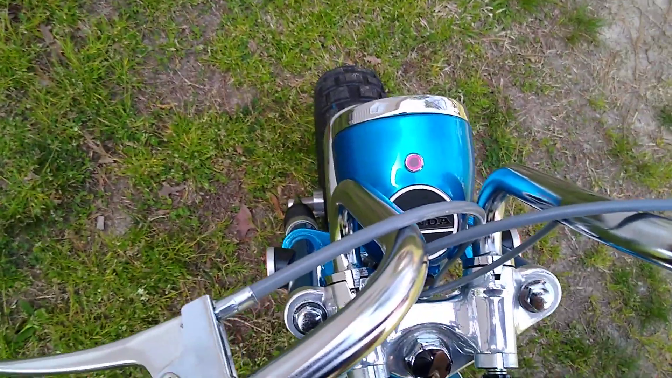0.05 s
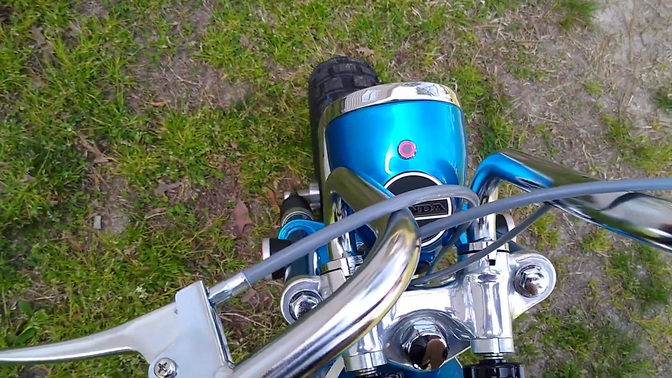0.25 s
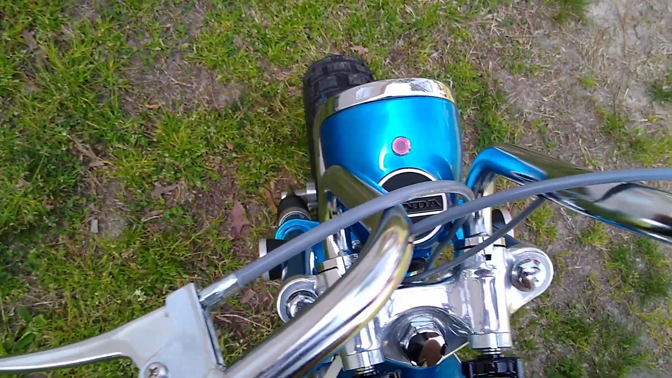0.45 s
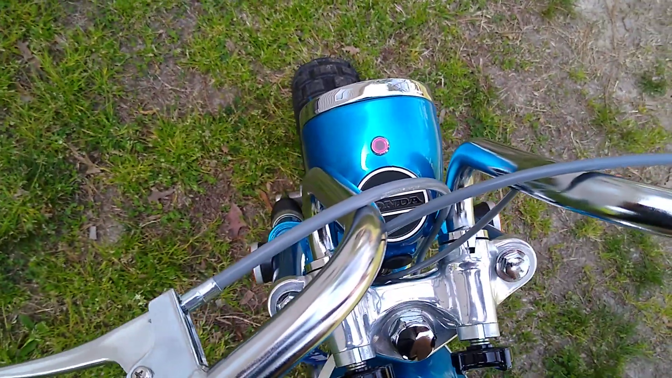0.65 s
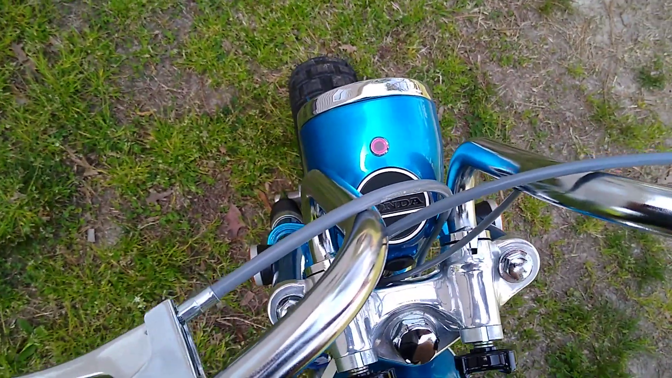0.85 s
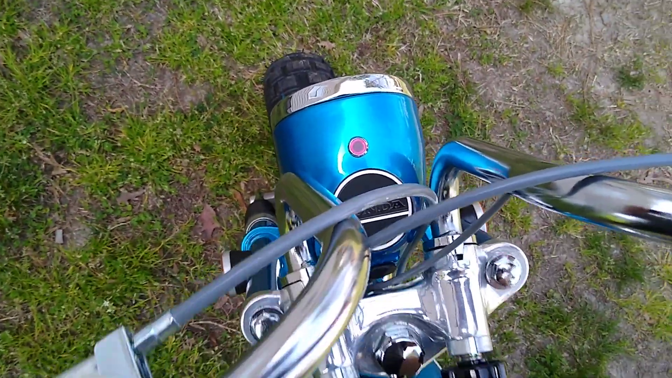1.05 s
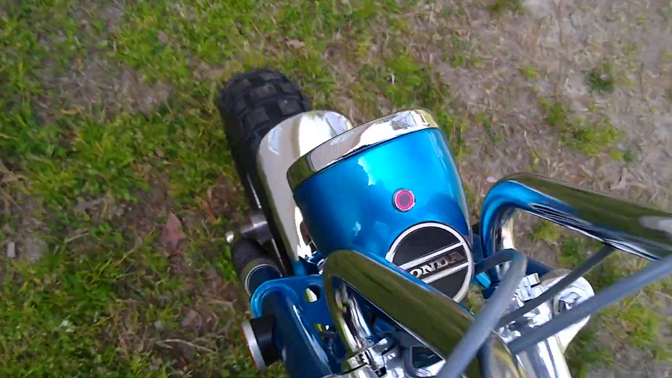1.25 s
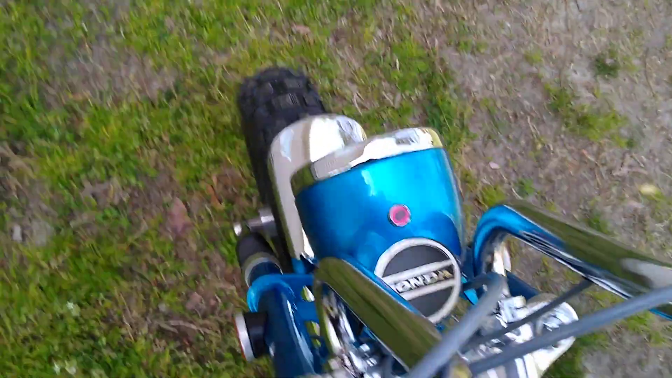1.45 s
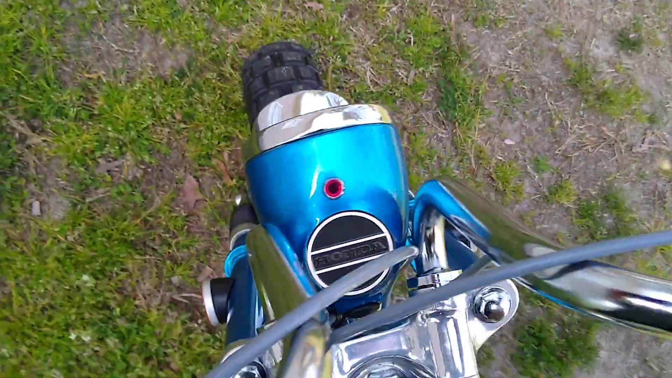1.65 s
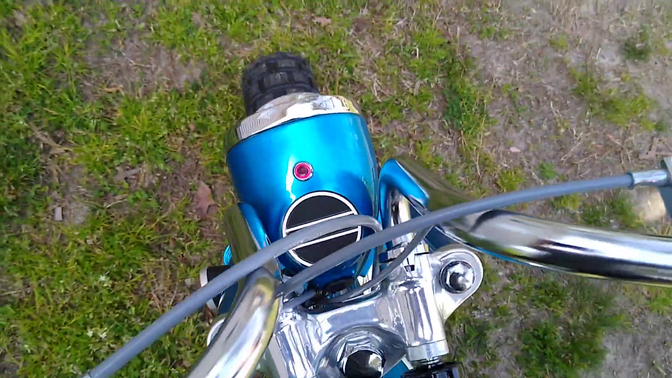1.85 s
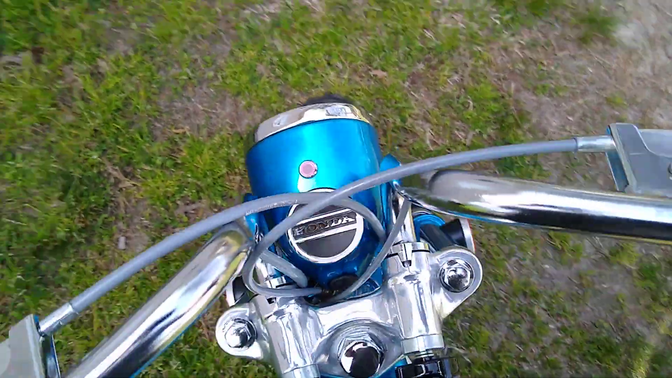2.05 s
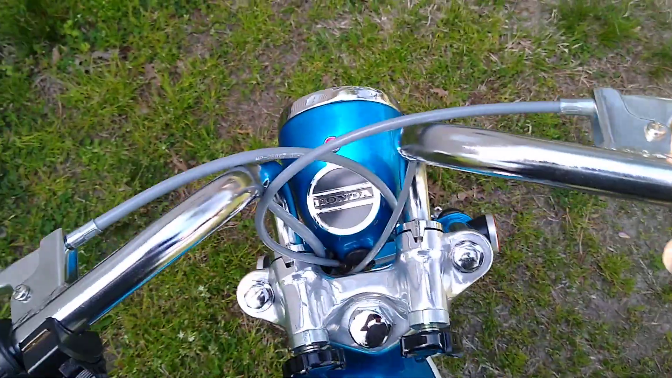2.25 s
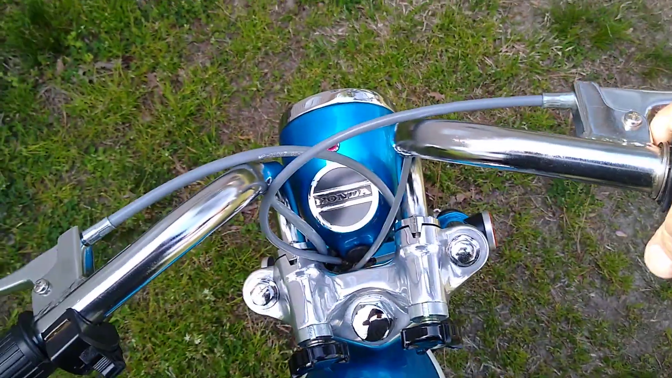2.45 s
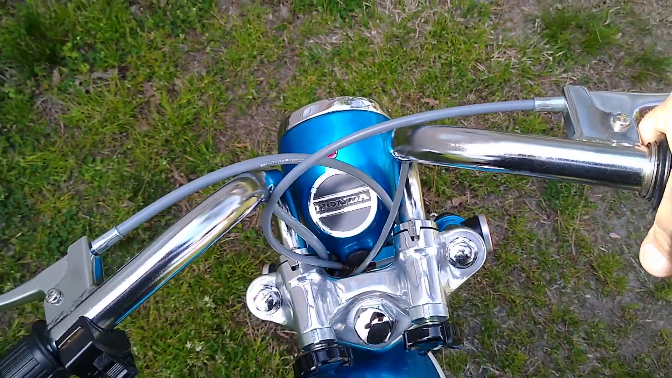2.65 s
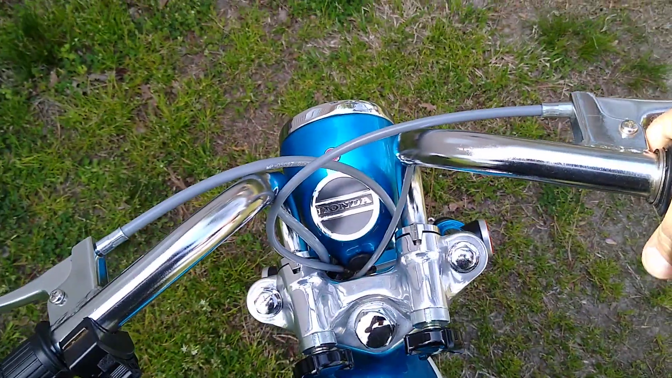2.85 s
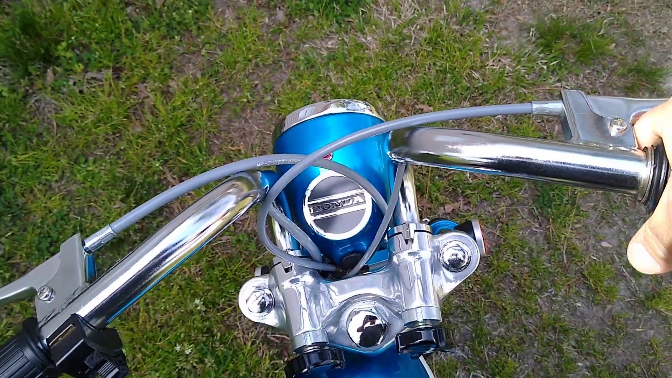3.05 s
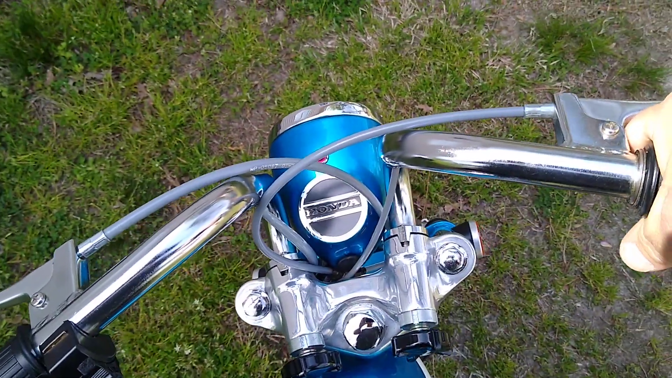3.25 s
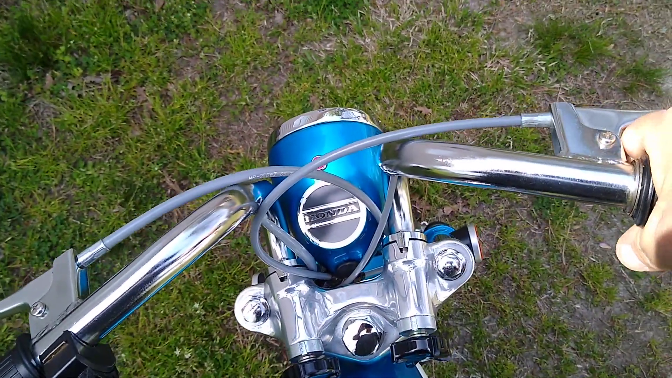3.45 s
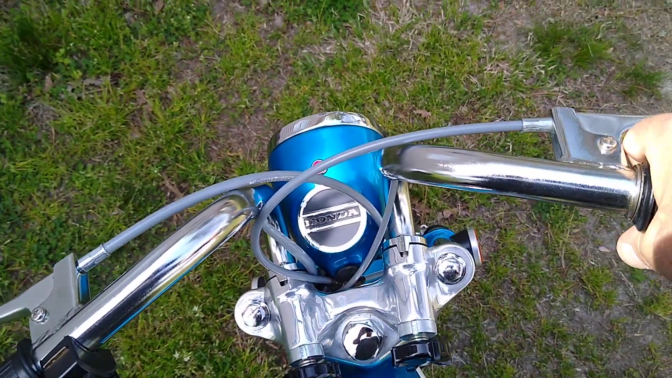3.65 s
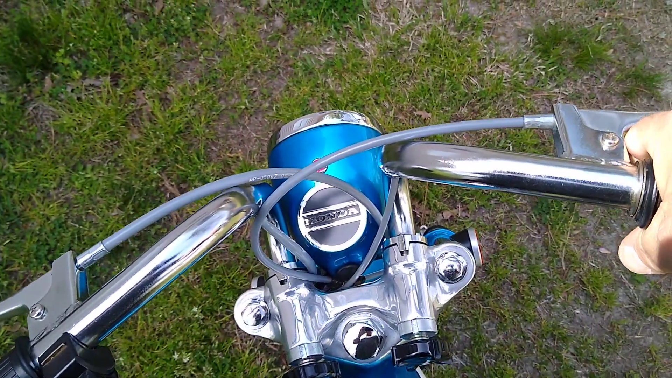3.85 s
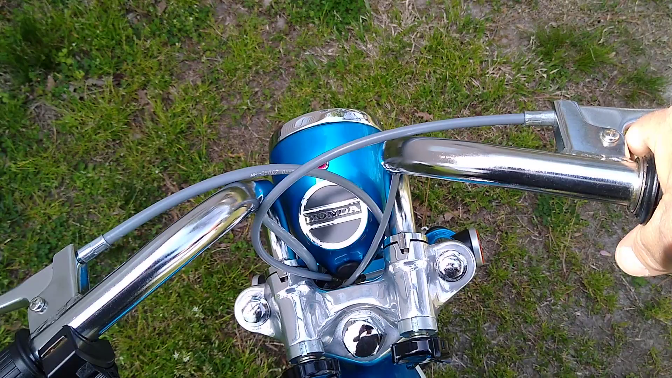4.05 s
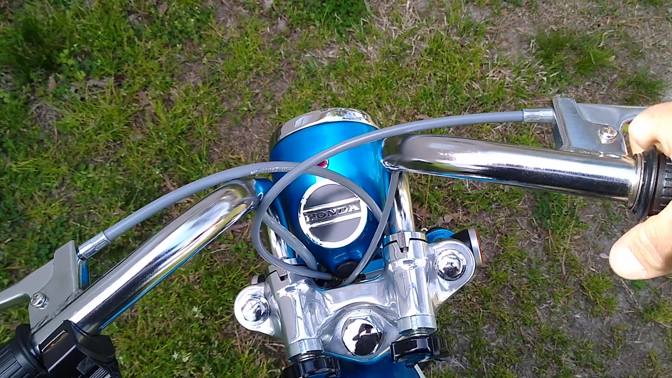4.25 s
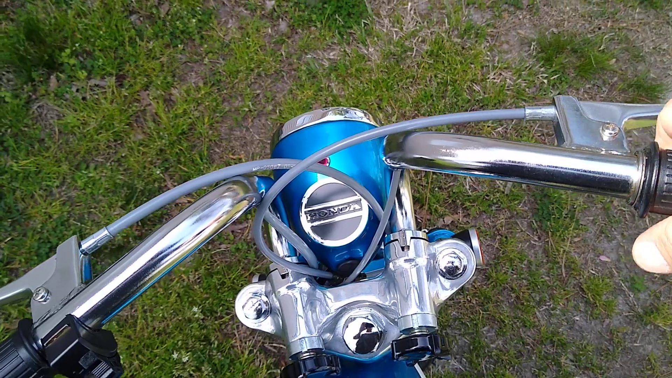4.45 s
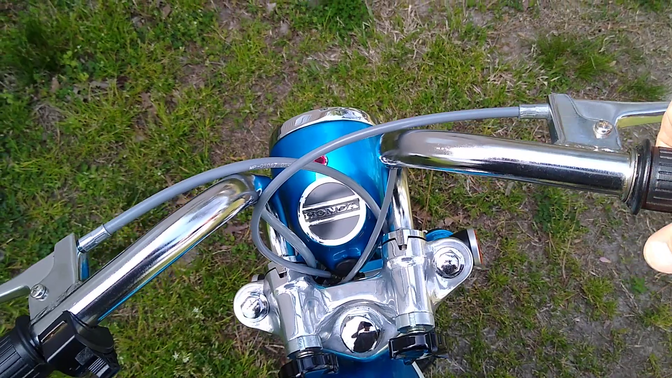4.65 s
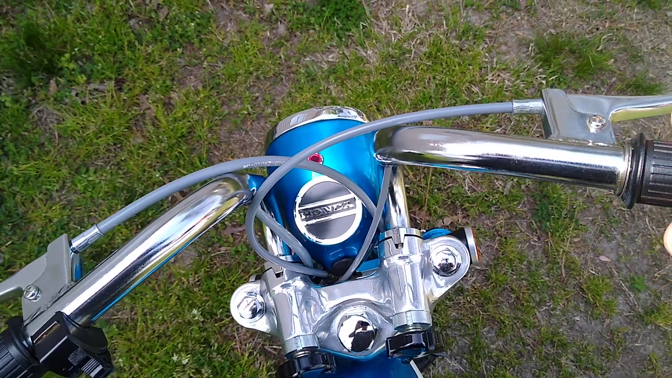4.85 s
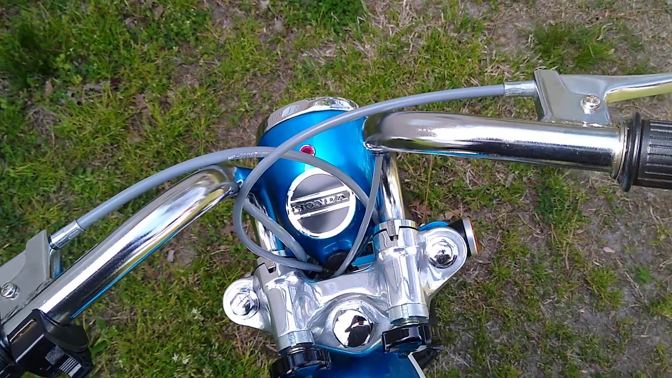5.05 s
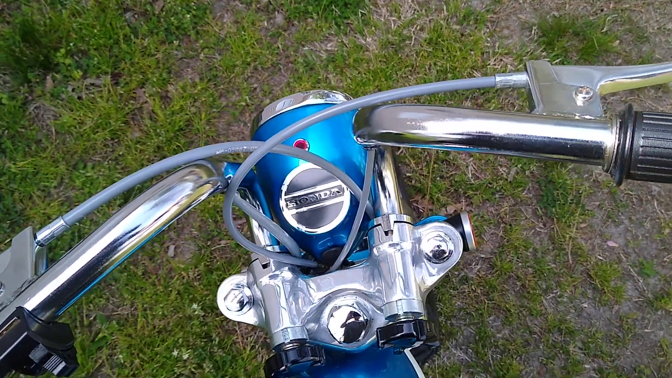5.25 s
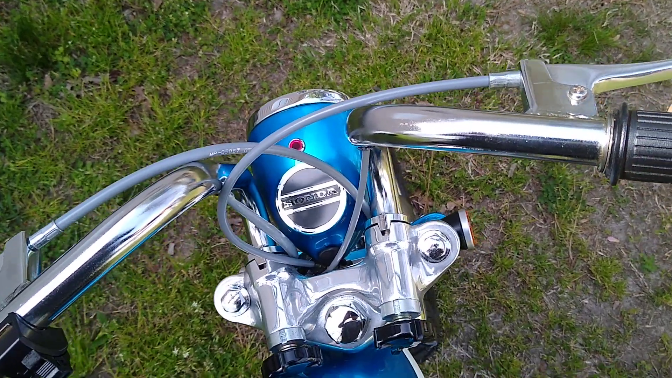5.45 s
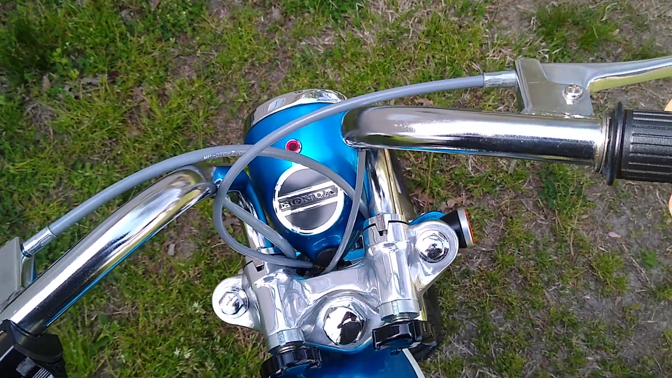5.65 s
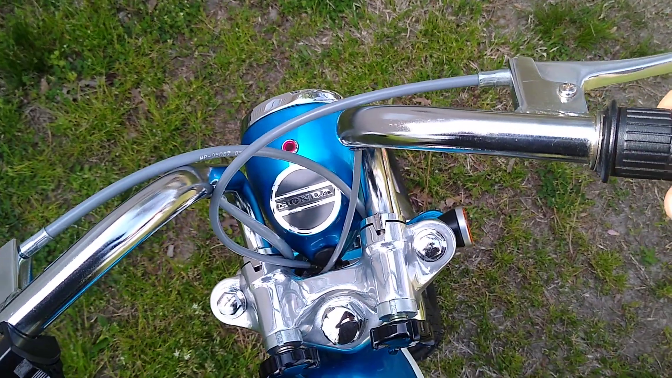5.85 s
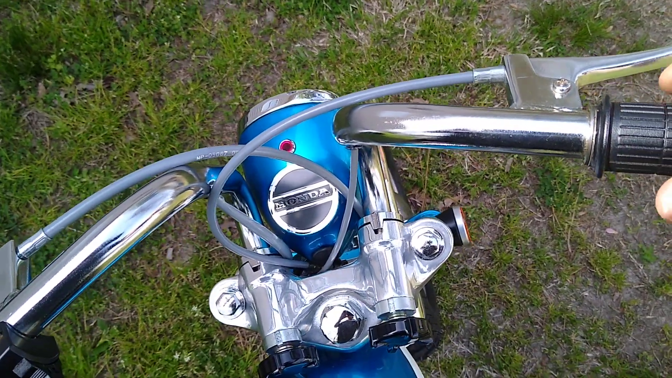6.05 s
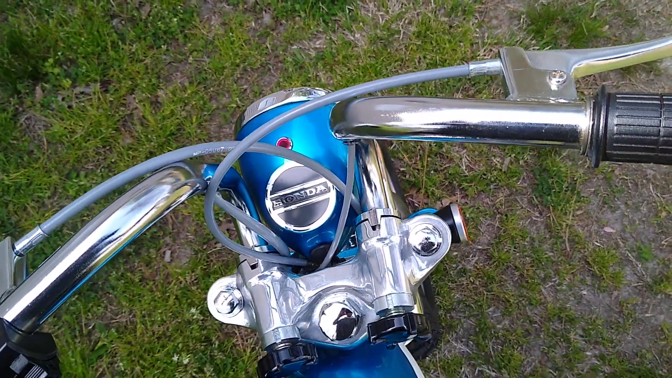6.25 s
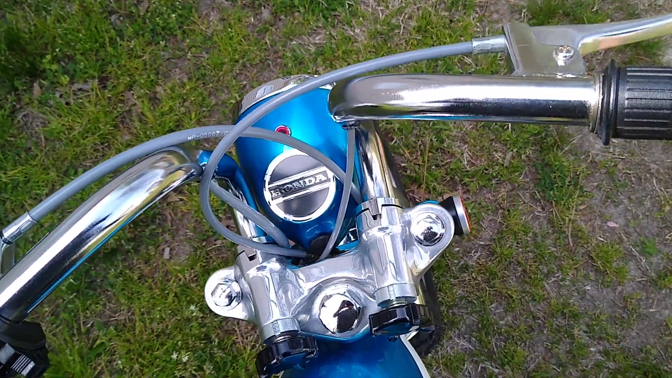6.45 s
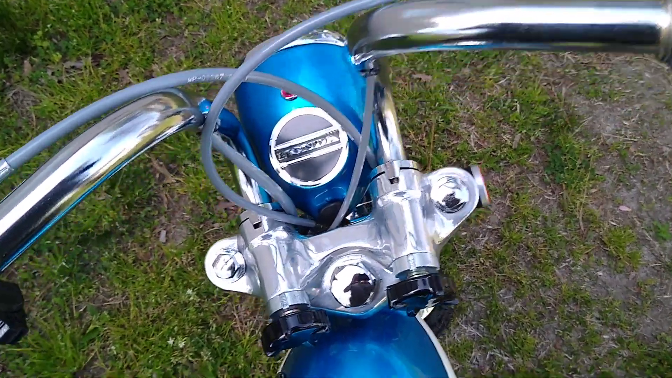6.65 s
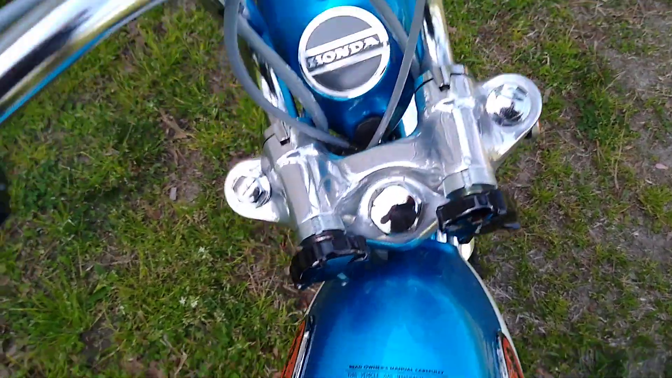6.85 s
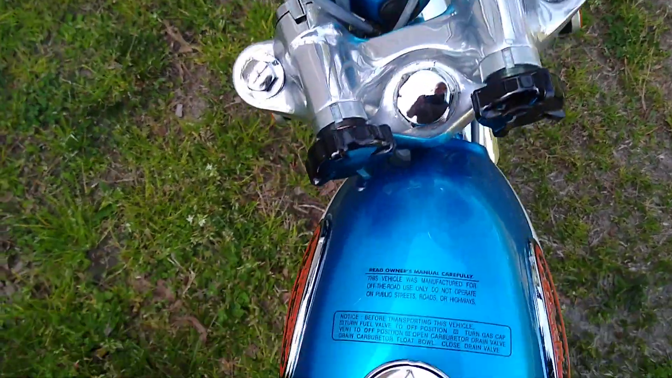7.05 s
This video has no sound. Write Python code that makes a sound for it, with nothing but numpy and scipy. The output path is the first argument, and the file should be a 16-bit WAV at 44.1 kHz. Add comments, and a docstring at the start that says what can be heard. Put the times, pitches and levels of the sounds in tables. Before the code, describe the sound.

A small motorcycle is kick-started, sputters and nearly stalls, then picks up to a steady fast idle.

```python
"""A far bird whistles over light wind and small controls click; then a small single-cylinder four-stroke
bike is kick-started on a lawn, heard from above its handlebar. It catches, misses, nearly dies and picks
up to a fast idle. Each exhaust stroke rings decaying sines of the pipe and silencer and spits a noise jet;
the intake gulps noise about half a cycle later. Noise and short rings make the gears, case and valve gear."""
import sys
import numpy as np
from scipy import signal
from scipy.fft import rfft, irfft, next_fast_len
from scipy.io import wavfile
from scipy.ndimage import uniform_filter1d

SR = 44100
rng = np.random.default_rng(int(sys.argv[2]) if len(sys.argv) > 2 else 0)


def log_audio(samples):
    """Write samples as a 16-bit WAV file to the path given in sys.argv[1]."""
    # one column per channel
    frames = np.atleast_2d(samples).T
    # limit to full scale, then quantise
    limited = np.clip(frames, -1, 1)
    pcm = np.round(limited * 32767).astype(np.int16)
    wavfile.write(sys.argv[1], SR, pcm)


N = 313110

# engine speed, from kick and catch through the near stall to idle: t/s, rate/(cycles per s)
SPEED = [(1.191, 0.0), (1.333, 13.649), (1.446, 11.798), (1.492, 13.755), (1.769, 17.733), (2.097, 14.781),
         (2.443, 22.98), (2.678, 21.1), (3.327, 11.293), (3.584, 8.554), (3.81, 12.948), (3.88, 9.709),
         (3.91, 13.445), (4.088, 13.906), (4.459, 17.215), (4.885, 23.488), (5.143, 24.711),
         (5.665, 24.865), (6.024, 23.549), (6.259, 23.597), (6.722, 22.889), (7.1, 22.931)]
# how hard the charge burns: t/s, level/dB
BURN = [(1.41, -0.5), (1.69, 2.5), (2.0, 0), (2.25, 3), (2.55, 2), (2.64, -7), (2.76, -4.5), (3.43, -18.5),
        (3.65, -5), (4.0, 0.5), (4.4, -0.5), (4.9, 1), (5.85, 2.4), (6.05, 0.5), (7.1, 1.7)]
# how hard the carburettor draws: t/s, level/dB
DRAW = [(1.2, -8), (1.35, 2.5), (1.5, 9.5), (1.76, 5), (1.87, 4), (2.0, -7), (2.12, 6), (2.36, 6.5),
        (2.52, -9), (3.42, -16), (3.55, -3), (3.85, 2), (5.45, 3), (5.72, -11), (6.8, -3), (7.1, -1)]
# stretches where the charge fails to light and the piston only pumps air: start t/s, end t/s, thump level/dB
MISFIRES = [(1.3, 1.36, -10), (1.78, 1.83, -19), (1.9, 1.95, -2), (2.03, 2.08, -1), (2.68, 2.73, 0.5),
            (2.78, 2.89, -2.5), (2.95, 3.21, -4), (3.3, 3.38, -2.5), (3.49, 3.58, 0), (6.48, 6.52, -3.5)]
# an unfired stroke: honk level/dB, crack level/dB, hiss level/dB
UNFIRED_DB = (-21.5, -34, -22.5)
# parts of a fired stroke, each:
# level/dB at the reference rate, slope/(dB per dB of burn), slope/(dB per dB of speed), slope/(dB per dB of draw)
THUMP_LAW = (0.78, 0.15, -0.53, -0.02)
HONK_LAW = (-1, 0.24, 0.94, 0.0059)
CRACK_LAW = (0.055, 0.94, 0.072, 0.0068)
HISS_LAW = (-0.23, 0.81, -0.43, 0.15)
# silencer and pipe resonances, relative levels:
# f/Hz, width/Hz, left level/dB, right level/dB, first swing (1 out, -1 in)
EXHAUST_MODES = [(55, 25, -40, -43, -1), (105, 37.2, -16.5, -19, 1), (135.2, 28, -21, -25, -1),
                 (150.9, 7.7, -26, -27, 1), (190.7, 8.4, -15.5, -18.5, -1), (347, 39, -18.5, -20, -1),
                 (442.2, 43, -14.5, -16.5, -1), (484, 125, -19.5, -31, -1), (717, 36, -25, -27, -1),
                 (888, 90, -24.5, -37, -1), (1455, 79, -11, -28.5, 1), (1523, 42.5, -11.5, -35, -1),
                 (2000, 62, -15.5, -62, 1), (2704, 83, -22.5, -55, -1), (3396, 17, -49, -43, 1),
                 (5570, 68, -45, -59, 1)]
# slow drift of the exhaust resonances' pitch: t/s, pitch ratio from 250 Hz to 1 kHz, pitch ratio above 1 kHz
RESONANCE_DRIFT = [(1.4, 0.89, 1.005), (2.5, 0.99, 1.015), (3.3, 1.07, 1.05), (3.8, 0.92, 0.97),
                   (5.5, 1.036, 1.0114), (6.3, 0.97, 0.98), (7.1, 0.99, 1.026)]
# colour of the exhaust jet: f/Hz, relative level/dB per Hz
JET_SPECTRUM = [(200, -34), (420, -3), (900, 19.5), (1150, 7.5), (1500, 0.5), (2700, 8), (3400, -1),
                (4300, 1.5), (6500, -4.5), (8500, -3.5), (12000, 3.5), (16000, -0.5)]
# colour of the intake gulp: f/Hz, relative level/dB per Hz
INTAKE_SPECTRUM = [(150, 24), (400, 26.5), (1000, 19), (1500, 31), (2100, 8), (3200, 5.5), (4500, 9),
                   (7500, 3), (10000, 10), (13000, 23.5), (16000, 16)]
# piston shaking the frame twice a cycle, with overtones: multiple of cycle rate, level/dB at the reference rate
SHAKE_ORDERS = [(2, -74.5), (4, -43), (6, -44.5)]
# colour of chain, cam and gears: f/Hz, relative level/dB per Hz
CLATTER_SPECTRUM = [(60, 15), (300, 15), (520, 8), (650, 3), (880, 4.5), (1150, 1), (1500, 1.5), (2000, 9),
                    (2400, -2), (3400, -7.5), (4200, -50), (7000, -64)]
# fine treble of gears and clicks: f/Hz, relative level/dB per Hz
SIZZLE_SPECTRUM = [(2500, 1), (4300, 9), (7000, 1.5), (9000, 0.5), (12500, 9), (16000, -2.5)]
# gear noise, each: level/dB at the reference rate, slope/(dB per dB of speed), slope/(dB per dB of draw)
CLATTER_LAW = (-31.5, 1.27, 0.0098)
SIZZLE_LAW = (-43.5, 0.95, 0.23)
# ringing of the cylinder head: f/Hz, width/Hz, relative level/dB
HEAD_MODES = [(826, 85, -10), (1590, 130, 4), (2140, 100, -3), (2680, 97, 0), (3970, 120, -10),
              (4260, 190, -5), (5230, 170, -10), (10100, 260, -5)]
# ringing of the engine case: f/Hz, width/Hz, relative level/dB
CASE_MODES = [(347, 25, -10), (503, 190, -2.5), (760, 60, -1), (830, 160, -5), (1436, 51, 4),
              (1610, 200, -7), (1898, 80, -2), (1980, 70, -6), (2170, 580, -12)]
# kick-start ratchet and gears as the lever is pushed: t/s, level/dB
WHIRR_LEVEL = [(1.17, -61), (1.238, -54), (1.25, -36.5), (1.32, -37), (1.4, -53), (1.74, -45), (1.82, -66)]
# colour of the ratchet: f/Hz, relative level/dB per Hz
RATCHET_SPECTRUM = [(100, 13), (330, 7.5), (600, -4), (1000, 6.5), (1200, -2), (1480, -3), (2100, -1),
                    (3200, -11), (4500, -30), (8000, -20), (13000, -6), (16000, -8)]
# slack gear teeth knocking once a cycle:
# start t/s, end t/s, place in the cycle (fraction), first relative level/dB, last relative level/dB
BACKLASH = [(1.3, 1.733, 0.48, -33.5, -15), (2.89, 3.58, 0.27, -34, -31)]
# clicks of the controls: t/s, relative level/dB, treble level/dB against it
CLICKS = [(0.5476, -54, 2), (0.5935, -52, -12), (0.687, -44, -25), (0.725, -40.5, -22), (0.7445, -41, -21),
          (0.918, -39.5, -31), (1.1763, -33, -27), (1.204, -35, -14)]
# two soft gusts, then a steady breeze: t/s, level/dB
WIND_LEVEL = [(0.08, -57), (0.188, -49.5), (0.246, -56), (0.354, -51), (0.556, -57)]
# colour of the wind: f/Hz, relative level/dB per Hz
AIR_SPECTRUM = [(15, -43), (25, -27), (59, 3), (154, -1), (427, -17), (1580, -23.5), (1860, -25.5),
                (2430, -29), (3730, -39), (4040, -33.5), (7090, -47.5), (8780, -45), (15000, -36)]
# whistles of the far bird: t/s, length/s, start f/Hz, end f/Hz, relative level/dB
BIRD_WHISTLES = [(0.01, 0.11, 3900, 3500, -69), (0.14, 0.055, 3500, 2750, -62),
                 (0.26, 0.055, 3000, 2380, -65), (0.505, 0.15, 3750, 3640, -72),
                 (0.72, 0.14, 3150, 2450, -72)]

REFERENCE_RATE = 24  # cycles per second, the 0 dB point of engine speed
BOOM_PER_SPEED_DB = 1.35  # the silencer's long boom builds with speed, fired or not: dB per dB
TICKS_PER_CYCLE = 9
TICK_DB, TICK_PER_SPEED_DB, TICK_SCATTER_DB = -40.5, 2.2, 3  # at the reference rate; dB per dB; spread
TOP_HZ = 15950  # the microphone's band limit


def amp(db):
    """Decibels to gain."""
    return 10 ** (np.asarray(db) / 20)


def unit(x):
    """Scale to rms 1."""
    return x / np.sqrt(np.mean(x ** 2) + 1e-20)


def curves(rows, at):
    """Read each column after the time at the given times, joined by straight lines."""
    s, *columns = np.transpose(rows)
    return np.array([np.interp(at, s, column) for column in columns])


def speed_db(at):
    """Engine speed at the given times, in dB over the reference rate."""
    return 20 * np.log10(np.maximum(curves(SPEED, at)[0] / REFERENCE_RATE, 1e-6))


def filtered(x, response):
    """Multiply the spectrum of x by a response of frequency."""
    m = next_fast_len(N + 8192)
    return irfft(rfft(x, m) * response(np.fft.rfftfreq(m, 1 / SR)), m)[..., :N]


def noise(spectrum, grain_db=0, apart_hz=900):
    """Stereo noise of rms 1, alike on both sides in the bass; grain_db breaks it into millisecond grains."""
    f, db = np.transpose(spectrum)
    grains = np.repeat(rng.standard_normal(N // 40 + 1), 40)[:N]
    white = rng.standard_normal((2, N)) * amp(grain_db * grains)

    def mid_side_response(hz):
        colour = amp(np.interp(np.log(hz + 1), np.log(f), db))
        return colour * [np.ones_like(hz), hz / np.hypot(hz, apart_hz)]

    mid, side = filtered(white, mid_side_response)
    return unit(np.array([mid + side, mid - side]))


def decaying_sines(hz, width, t):
    """One ring per resonance; a wider resonance dies sooner."""
    return np.exp(-np.pi * width[:, None] * t) * np.sin(2 * np.pi * hz[:, None] * t)


def pan(left_db):
    """Gains of the two channels, the left one louder by left_db."""
    return amp([[left_db / 2], [-left_db / 2]])


def add(track, s, sound):
    """Mix a sound in at time s."""
    part = track[..., max(round(s * SR), 0):][..., :sound.shape[-1]]
    part += sound[..., :part.shape[-1]]


def strokes():
    """One row per engine cycle, (s, thump, honk, crack, hiss, intake in dB), set by burn, speed and draw."""
    t = np.arange(round(SPEED[0][0] * SR), N) / SR
    turns = np.cumsum(curves(SPEED, t)[0]) / SR
    times = np.interp(np.arange(1, int(turns[-1]) + 1), turns, t)
    burn_db, draw_db = curves(BURN, times)[0], curves(DRAW, times)[0]
    controls = np.array([np.ones_like(times), burn_db, speed_db(times), draw_db])
    fired_db = np.array([THUMP_LAW, HONK_LAW, CRACK_LAW, HISS_LAW]) @ controls
    levels = np.vstack([fired_db, draw_db]).T
    for start, end, thump_db in MISFIRES:
        levels[(times > start) & (times < end), :4] = (thump_db, *UNFIRED_DB)
    # no two strokes are alike: one draw each moves all five levels, the hiss most
    levels += rng.standard_normal((len(times), 1)) * [.3, .35, .8, 1.5, 1]
    return np.column_stack([times, levels])


def exhaust(cycles, scatter_db=1.5, detune=.006):
    """Each blow-down rings the silencer and pipe; a harder burn reaches the higher resonances."""
    out, t = np.zeros((2, N)), np.arange(SR // 5) / SR
    hz, width, left_db, right_db, swing = np.transpose(EXHAUST_MODES)
    in_pipe = hz > 250
    boom = (hz > 165) & ~in_pipe
    for s, thump_db, honk_db, crack_db, _, _ in cycles:
        # the high resonances vary most from stroke to stroke
        chance = rng.standard_normal((2, len(hz))) * np.minimum(hz / 1400, 1)
        db = np.interp(hz, [200, 330, 520, 900], [thump_db, honk_db, honk_db, crack_db])
        db = db + boom * BOOM_PER_SPEED_DB * speed_db(s) + scatter_db * chance[1]
        low_ratio, high_ratio = curves(RESONANCE_DRIFT, s)
        drift = np.select([hz > 1000, in_pipe], [high_ratio, low_ratio], 1)
        rings = decaying_sines(hz * drift * (1 + detune * chance[0]), width, t)
        gains = np.sign(swing) * amp(np.array([left_db, right_db]) + db)
        add(out, s + .0005, gains @ rings)
    return out


def bounce(x, delay=.00231, share=.6):
    """The silencer's outlet is low: the ground sends a second copy up just after the first."""
    return filtered(x, lambda hz: 1 + share * np.exp(-2j * np.pi * hz * delay))


def piped(x, pipe_hz=678, reflection=0.19):
    """Sound runs to and fro in the tailpipe, which favours multiples of its own note."""
    return filtered(x, lambda hz: 1 / (1 - reflection * np.exp(-2j * np.pi * hz / pipe_hz)))


def gas(cycles, rise=0.00083, decay=0.005, tail=0.035, tail_db=-14, intake_phase=0.45, intake_width=0.075):
    """A jet spits as the exhaust valve opens; about half a cycle later the carburettor gulps air."""
    # rise, decay and tail in seconds; intake phase and width in cycles
    spit, gulp, t = np.zeros(N), np.zeros(N), np.arange(SR // 8) / SR
    last_end = cycles[-1, 0] + 1 / SPEED[-1][1]
    periods = np.minimum(np.diff(cycles[:, 0], append=last_end), .075)
    burst = (1 - np.exp(-(t / rise) ** 2)) * (np.exp(-t / decay) + amp(tail_db) * np.exp(-t / tail))
    for (s, *_, hiss_db, intake_db), period in zip(cycles, periods):
        add(spit, s - .0002, amp(hiss_db) * burst)
        swell = np.exp(-((t / period - intake_phase) / intake_width) ** 2 / 2)
        add(gulp, s, amp(intake_db) * swell)
    jet = amp(-20.0) * piped(spit * noise(JET_SPECTRUM, grain_db=-0.5, apart_hz=1510)) * pan(3.3)
    intake = amp(-28.5) * gulp * noise(INTAKE_SPECTRUM, grain_db=0.5) * pan(6.6)
    return jet + intake


def shake(cycles, growth=0.13):
    """The unbalanced piston hums through the frame, more strongly as the engine speeds up."""
    t = np.arange(N) / SR
    times = np.append(cycles[:, 0], cycles[-1, 0] + 1 / SPEED[-1][1])
    turns = np.interp(t, times, np.arange(len(times)))
    rate = np.abs(uniform_filter1d(np.gradient(turns) * SR, size=2000))
    hum = sum(amp(db) * np.sqrt(2) * np.sin(2 * np.pi * round(order) * turns) for order, db in SHAKE_ORDERS)
    return hum * (rate / REFERENCE_RATE) ** growth * pan(3.0)


def case(f):
    """Response of the engine case: a sum of its resonances with alternating sign."""
    return sum((-1) ** k * amp(db) * 1j * f * width / (centre * centre - f * f + 1j * f * width)
               for k, (centre, width, db) in enumerate(CASE_MODES))


def cased(x, ring_db=11):
    """Noise from inside the engine, coloured by the ringing case; rms 1."""
    return unit(filtered(x, lambda f: np.hypot(1, amp(ring_db) * np.abs(case(f)))))


def gears():
    """Chain, cam and gears keep up a grainy clatter between the firings, louder with speed."""
    t = np.arange(N) / SR
    controls = np.array([np.ones(N), speed_db(t), curves(DRAW, t)[0]])
    clatter_db, sizzle_db = np.array([CLATTER_LAW, SIZZLE_LAW]) @ controls
    clatter = amp(clatter_db) * cased(noise(CLATTER_SPECTRUM, grain_db=2.5, apart_hz=1450)) * pan(4.6)
    sizzle = amp(sizzle_db) * noise(SIZZLE_SPECTRUM, grain_db=0.5) * pan(0.91)
    return clatter + sizzle


def ticks(cycles):
    """Loose tappets and chain links tap the cylinder head at random, each with a colour of its own."""
    out, t = np.zeros((2, N)), np.arange(SR // 40) / SR
    hz, width, db = np.transpose(HEAD_MODES)
    places = rng.uniform(0, len(cycles) - 1, len(cycles) * TICKS_PER_CYCLE)
    times = np.interp(places, np.arange(len(cycles)), cycles[:, 0])
    rings = decaying_sines(hz, width, t)
    scatter = TICK_SCATTER_DB * rng.standard_normal(len(times))
    levels = TICK_DB + TICK_PER_SPEED_DB * speed_db(times) + scatter
    colours = rng.standard_normal((len(times), 2, len(hz)))
    for s, level, colour in zip(times, levels, colours):
        add(out, s, amp(level + db) * colour @ rings)
    return out * pan(14.0)


def whirr():
    """The kick-start ratchet and gears whirr as case-coloured noise that swells and fades with the kick."""
    t = np.arange(N) / SR
    engaged = (t > WHIRR_LEVEL[0][0]) & (t < WHIRR_LEVEL[-1][0])
    level = engaged * amp(curves(WHIRR_LEVEL, t)[0])
    return level * cased(noise(RATCHET_SPECTRUM, grain_db=3.5)) * pan(5.2)


def backlash(cycles):
    """List (s, relative dB) for each knock of the gear teeth across their slack."""
    times = cycles[:, 0]
    return [(s + place * period, np.interp(s, [start, end], [first_db, last_db]))
            for start, end, place, first_db, last_db in BACKLASH
            for s, period in zip(times, np.diff(times)) if start < s < end]


def knocks(cycles, gear_decay=0.0068, click_decay=0.0035):
    """Slack gears and controls strike the engine case with decaying noise; the clicks add bare treble."""
    # decays in seconds
    force, snap, t = np.zeros(N), np.zeros(N), np.arange(SR // 10) / SR
    for s, db in backlash(cycles):
        add(force, s, amp(db + 17.0) * np.exp(-t / gear_decay))
    for s, db, treble_db in CLICKS:
        add(force, s, amp(db + 4) * np.exp(-t / click_decay))
        add(snap, s, amp(db + treble_db - 2.5) * np.exp(-t / click_decay))
    rattle = filtered(force * rng.standard_normal((2, N)), case) * pan(9.9)
    return rattle + snap * noise(SIZZLE_SPECTRUM)


def bird(warble=0.017):
    """A far bird's gliding, quivering sine whistles, blurred by trees as a decaying noise echo."""
    song = np.zeros(N)
    quiver = 1 + warble * unit(uniform_filter1d(rng.standard_normal(SR), size=120))
    for s, length, start_hz, end_hz, db in BIRD_WHISTLES:
        hz = np.linspace(start_hz, end_hz, int(length * SR))
        phase = 2 * np.pi * np.cumsum(hz * quiver[:len(hz)]) / SR
        add(song, s, amp(db) * np.hanning(len(hz)) * np.sin(phase))
    t = np.arange(SR // 2) / SR
    trees = rng.standard_normal((2, len(t))) * amp(-60 * t / 0.48)  # falls 60 dB in 0.48 s
    trees = trees / np.linalg.norm(trees[0])
    blurred = signal.fftconvolve(song[None], trees, axes=1)[:, :N]
    return .5 * song + 1.1 * blurred


def wind():
    """Light wind: bass-heavy noise that swells in two soft gusts, then holds steady."""
    return amp(curves(WIND_LEVEL, np.arange(N) / SR)[0]) * noise(AIR_SPECTRUM, apart_hz=164)


def scene():
    """The bike on the lawn, with bird and wind behind it."""
    cycles = strokes()
    engine = amp(-0.5) * bounce(exhaust(cycles)) + gas(cycles) + shake(cycles) + gears() + ticks(cycles)
    return engine + whirr() + knocks(cycles) + bird() + wind()


def record(dry, low_hz=48):
    """The microphone sheds deep bass, rounds off the highest peaks and keeps nothing above its band limit."""
    thin = filtered(dry, lambda hz: (hz / low_hz) ** 2 / np.sqrt(1 + (hz / low_hz) ** 4))
    rounded = thin / (1 + np.abs(thin) ** 6) ** (1 / 6)
    return filtered(rounded, lambda hz: hz < TOP_HZ)


dry = scene()
out = record(dry)
log_audio(out)
```